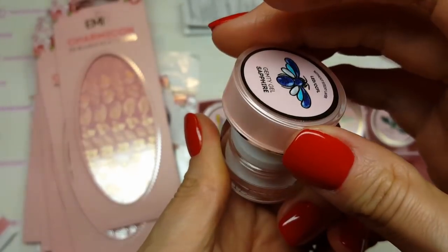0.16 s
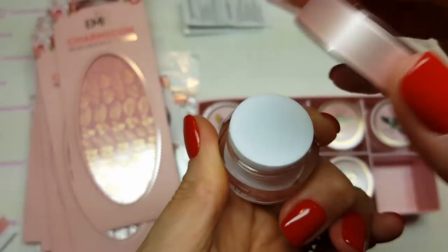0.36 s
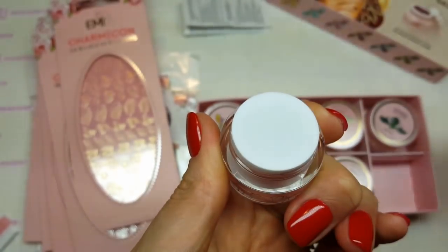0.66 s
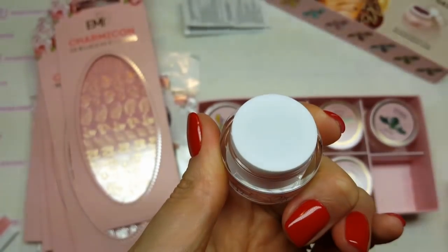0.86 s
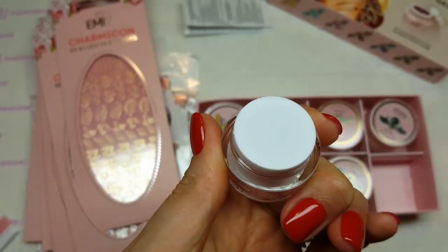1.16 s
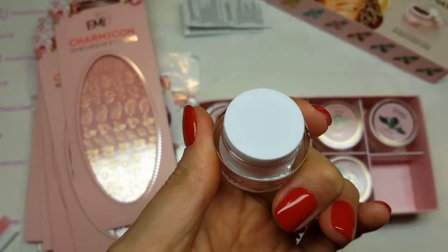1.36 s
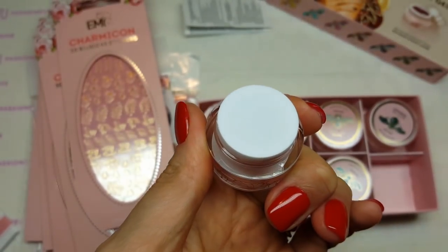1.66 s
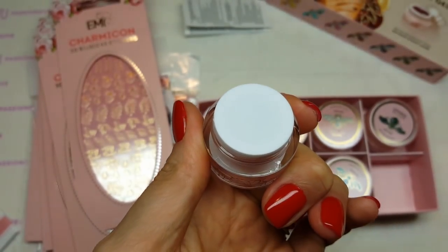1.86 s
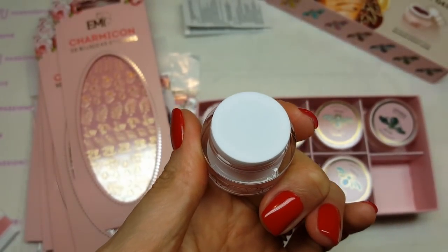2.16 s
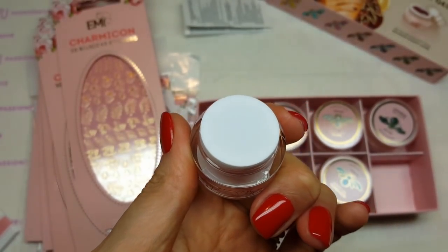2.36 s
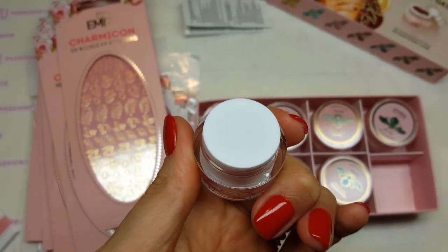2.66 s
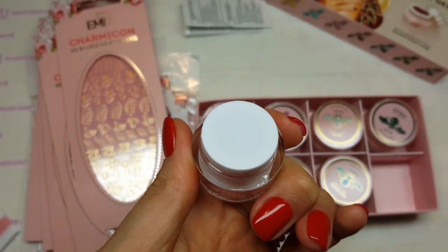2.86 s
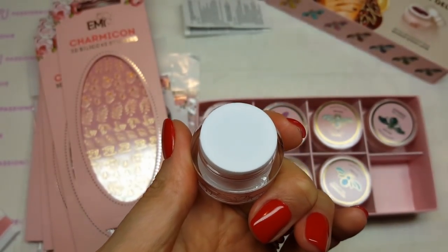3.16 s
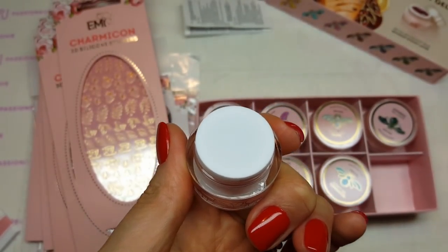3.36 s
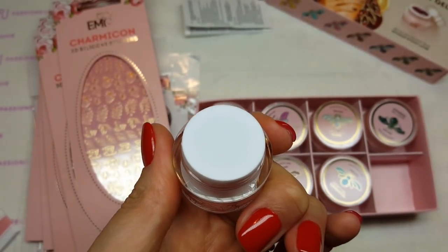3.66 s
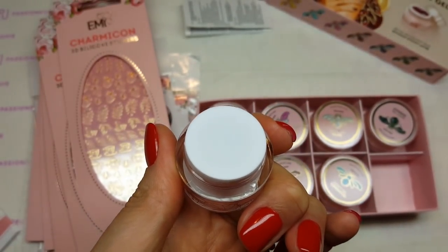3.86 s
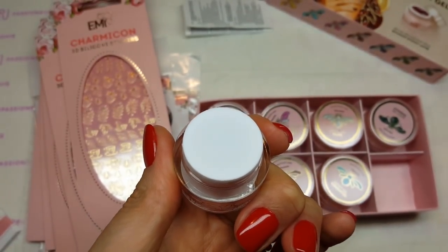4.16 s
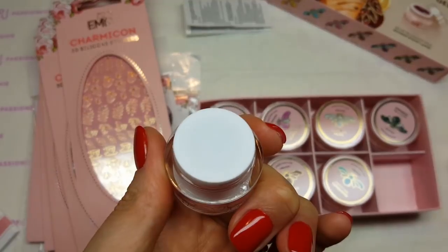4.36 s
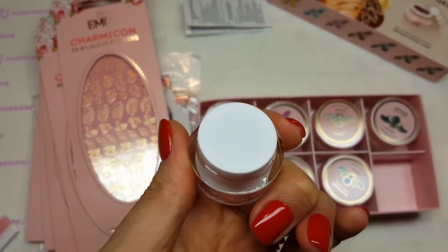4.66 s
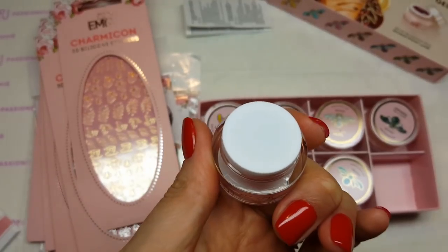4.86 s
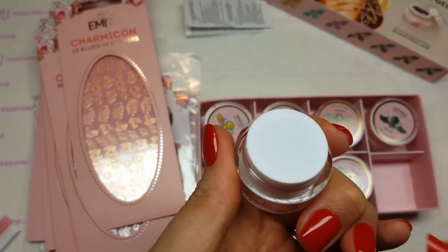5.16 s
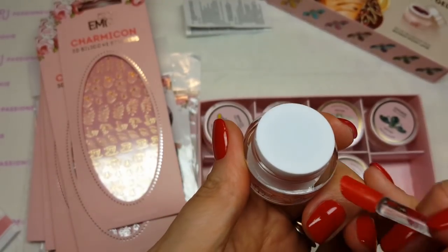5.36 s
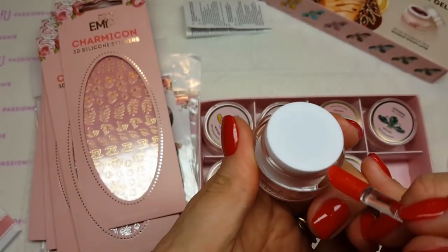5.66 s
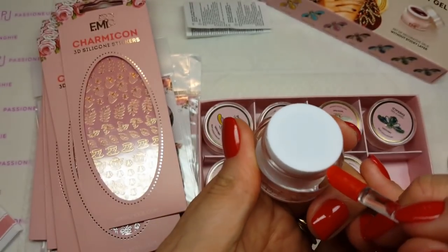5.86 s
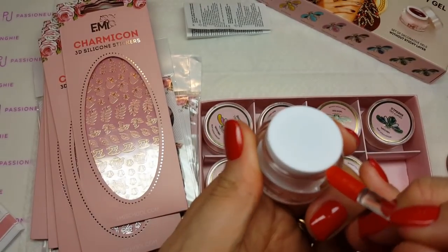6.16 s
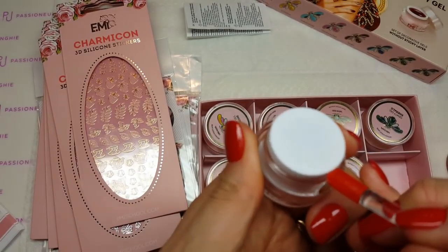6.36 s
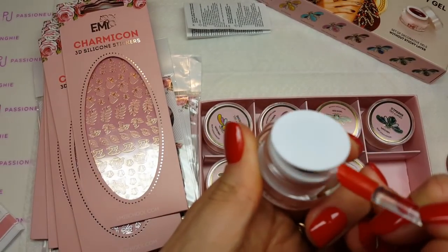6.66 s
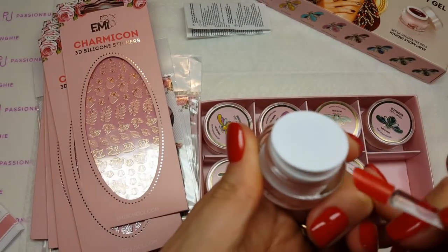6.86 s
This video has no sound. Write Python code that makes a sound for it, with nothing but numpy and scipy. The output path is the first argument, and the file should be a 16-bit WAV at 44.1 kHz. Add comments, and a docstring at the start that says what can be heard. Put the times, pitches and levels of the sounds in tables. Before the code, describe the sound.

Low room air, microphone hiss and a very faint electronic whine run throughout, in a small bare room that rings briefly after each sound. A light fingernail click comes at about 1 second. At 1.7 seconds a small plastic lid touches a table, gives a sharp tick near 1.9, and scrapes along with a light rattle. It lands at 2.4 seconds with a crisp clack, the loudest moment, followed by a tiny tick. From about 3.8 to 4.9 seconds, nearer the microphone, a hand shifts its grip on the hollow jar, making soft bumps, slight skin rubs and nail ticks, busiest around 4.5. After a pause, a nail taps the jar at 6.4 seconds, and fingertips rustle with a fine dry crackle until about 6.8 as they take up a brush. All the handling sounds come from slightly right of centre.

```python
"""A small bare room, with a table to the right of a camera's stereo microphone. The plastic lid of a
small jar, just taken off, touches the table, scrapes along it in tiny slips and clacks down, ringing
briefly. Nearer the microphone, a hand shifts its grip on the hollow jar with soft bumps and nail ticks,
then fingertips rustle as they take up a brush. The room rings after each sound, and under it all
lie room air, microphone hiss and the faint whine of the camera's electronics."""
import sys
import numpy as np
from scipy import signal
from scipy.fft import rfft, irfft, next_fast_len
from scipy.io import wavfile

SR = 44100
rng = np.random.default_rng(int(sys.argv[2]) if len(sys.argv) > 2 else 0)


def generate_wav(signal):
    """Clip the signal to [-1, 1] and save it as 16-bit WAV at the path in sys.argv[1]."""
    frames = np.transpose(np.atleast_2d(signal))
    scaled = np.clip(frames, -1, 1) * 32767
    pcm = np.round(scaled).astype(np.int16)
    wavfile.write(sys.argv[1], SR, pcm)


N = 309582

# room air and microphone hiss: (frequency [Hz], relative level [dB])
AIR_SPECTRUM = [(15, -21), (25, -11.5), (114, 1.5), (184, -3.5), (260, -2), (1100, -11.5), (1320, -10.5),
                (1430, -12), (2190, -13.5), (2640, -14), (5860, -18.5), (7070, -21), (8980, -20),
                (10500, -18), (14500, -20.5)]
# stereo image of that air: (frequency [Hz], left-right likeness [-1 to 1])
AIR_LIKENESS = [(60, 0.44), (150, 0.23), (600, 0)]
# steady tones of the electronics: (frequency [Hz], level [dB])
ELECTRONIC_TONES = [(49.5, -82.5), (1359.5, -85), (2719, -88.5), (10894, -103)]
# the room's decay: (frequency [Hz], time to fall 60 dB [s])
ROOM_DECAY = [(100, 0.32), (300, 0.58), (600, 0.38), (2000, 0.4), (5000, 0.37), (13000, 0.37)]
# colour of the room's tail: (frequency [Hz], gain [dB])
ROOM_SPECTRUM = [(100, 4), (300, -.5), (600, 0), (1000, -4), (2100, -5), (3200, -5), (5000, -1.5),
                 (13000, -6.5)]
# stereo image of the tail: (frequency [Hz], left-right likeness [-1 to 1])
ROOM_LIKENESS = [(100, 0.845), (300, 0.91), (630, 0.61), (1370, -.05), (3000, 0.0092)]

# skin rubs on the jar: (start [s], length [s], relative level [dB])
GRIP_STROKES = [(3.77, 0.031, -71), (4.315, 0.082, -66.5), (4.535, 0.024, -62.5)]
# colour of that rubbing: (frequency [Hz], relative level [dB])
GRIP_SPECTRUM = [(150, -48), (250, 3), (485, -11), (693, -8.5), (2500, -15.5), (3310, -21.5), (11000, -28),
                 (14500, -31)]
# fingertips take up the brush: (start [s], length [s], relative level [dB])
FINGER_STROKES = [(6.495, 0.155, -64), (6.665, 0.083, -58)]
# colour of their rustle: (frequency [Hz], relative level [dB])
FINGER_SPECTRUM = [(100, -32), (290, 9), (500, -17), (2000, 0), (4000, -5.5), (6500, 1.5), (8000, 7),
                   (11000, 2.5), (13500, 13), (16000, -15)]
# flesh bumps the jar and a nail ticks with it:
# (time [s], bump level [dB], bump tilt [dB/octave], nail level [dB], nail tilt [dB/octave])
GRIP_BUMPS = [(1.079, -57.5, -8, -70, 0), (1.732, -42.5, 6.5, -45, -2), (3.7558, -42.5, 5.5, -36, -2.5),
              (4.0316, -54, -1, -38.5, 3), (4.222, -41.5, 4, -47, 3), (4.335, -50, 5, -55, -2),
              (4.394, -45, 4, -40.5, -0.5), (4.501, -42, -2, -57, -4), (4.547, -38, 3.5, -43, -3),
              (4.5597, -35.5, 1.5, -33.5, 0.5)]
# modes of a bump's thud: (frequency [Hz], relative level [dB], time to fall 60 dB [s])
THUD_MODES = [(77, -8, 0.07), (110.2, 0.5, 0.16), (186, 0.5, 0.034), (235, -5, 0.044), (297.4, -6, 0.072),
              (440, -9.5, 0.014), (705, -18.5, 0.027)]
# modes of the hollow jar: (frequency [Hz], relative level [dB], time to fall 60 dB [s])
JAR_MODES = [(770, 8.5, 0.014), (1495, 7, 0.018), (3080, 0, .008)]
# a nail taps the jar: (time [s], level [dB], tilt [dB/octave])
JAR_TAPS = [(4.0318, -41, 1), (4.489, -48, 3), (6.3945, -45.5, 13)]
# nails click on their own, close to the microphone: (time [s], level [dB], tilt [dB/octave])
NAIL_CLICKS = [(1.048, -42.5, 5), (4.5705, -32, 7.5), (4.8684, -41, 1), (6.3945, -40, 5),
               (6.4975, -40, 4.5), (6.5255, -36, 0.5), (6.557, -40, 0.5), (6.6425, -38, -2),
               (6.672, -36.5, 9)]
# colour of nail clicks and catching skin: (frequency [Hz], relative level [dB])
CLICK_SPECTRUM = [(100, -34), (400, -4), (800, 1.5), (1500, 4.5), (2500, 16), (4500, 1), (6500, 3.5),
                  (9000, 0), (13000, -3), (16000, -15.5)]

# the lid is pushed lightly, then firmly, each layer at a relative level:
# (start [s], length [s], judder [dB], chatter [dB], hiss [dB])
LID_PUSHES = [(1.756, 0.11, -52.5, -47.5, -61.5), (1.965, 0.43, -45, -48, -68.5)]
# the lid juddering on the table: (frequency [Hz], relative level [dB])
JUDDER_SPECTRUM = [(40, -32), (80, -20.5), (115, -12), (170, -10), (250, -8), (330, -0.5), (420, -1.5),
                   (520, -4), (700, -4.5), (950, -4), (1300, -8.5), (2500, -40.5)]
# its rim chattering: (frequency [Hz], relative level [dB])
CHATTER_SPECTRUM = [(400, -32.5), (900, -1.5), (1300, 7), (1650, 5.5), (2000, 5), (2600, -2.5), (3200, -10),
                    (3900, -18), (6000, -47.5)]
# the fine surface texture hissing: (frequency [Hz], relative level [dB])
HISS_SPECTRUM = [(1500, -10.5), (3500, -2), (5000, -1.5), (8000, -10), (12000, -12), (15000, -7.5)]
# the lid's hard edge ticks: (time [s], level [dB], tilt [dB/octave])
EDGE_TICKS = [(1.7315, -32.5, -6), (1.9322, -19.5, 2), (1.9412, -36, 6), (2.604, -34, -10)]
# colour of those ticks: (frequency [Hz], relative level [dB])
EDGE_SPECTRUM = [(100, -48), (800, -24), (3000, -11.5), (5300, -7), (6800, -4.5), (9000, -0.5), (13000, 2),
                 (16000, -5)]
# the rim knocks on the table, then clacks down: (time [s], level [dB], tilt [dB/octave])
LID_KNOCKS = [(1.7312, -38, -2), (1.765, -40, 2.5), (1.893, -31.5, 0.5), (1.9845, -35.5, -2.5),
              (2.064, -31.5, -2), (2.146, -25.5, -1.5), (2.4017, -7.5, -1.5)]
# modes of the lid on the table: (frequency [Hz], relative level [dB], time to fall 60 dB [s])
LID_MODES = [(340, -17.5, 0.013), (536, -7.5, 0.05), (604, -6.5, 0.046), (703, -7, 0.045),
             (948, -5.5, 0.066), (1311, -7.5, 0.049), (1585, -1, 0.028), (1997, 8, 0.014),
             (2287, -4.5, 0.02), (3045, -4, 0.024), (3337, -10, 0.011)]
# the snap of the rim's contact: (frequency [Hz], relative level [dB])
SNAP_SPECTRUM = [(40, -45), (200, -21), (700, -1.5), (2300, 7.5), (3300, 9.5), (4300, 1), (5200, -2.5),
                 (6500, -3.5), (8000, -13.5), (10000, -8), (15000, -31.5)]


def amp(db):
    """Decibels as a gain."""
    return 10 ** (np.asarray(db) / 20)


def unit(x):
    """x scaled to rms 1."""
    return x / np.sqrt(np.mean(x ** 2) + 1e-20)


def along(points, hz):
    """A curve through (frequency, value) points on a log axis."""
    freqs, values = np.transpose(points)
    return np.interp(np.log(hz + 1), np.log(freqs + 1), values)


def filtered(x, response):
    """x times a complex response of frequency."""
    n = x.shape[-1]
    size = next_fast_len(n + SR // 2)
    return irfft(rfft(x, size) * response(np.fft.rfftfreq(size, 1 / SR)), size)[..., :n]


def impulse(spectrum, tilt_db=0, size=2048):
    """The shortest causal pulse with this spectrum, tilted per octave above 500 Hz."""
    hz = np.fft.rfftfreq(size, 1 / SR)
    octaves = np.log2(np.maximum(hz, 500) / 500)
    cepstrum = irfft(np.log(amp(along(spectrum, hz) + tilt_db * octaves)))
    cepstrum[1:size // 2] *= 2
    cepstrum[size // 2 + 1:] = 0
    return irfft(np.exp(rfft(cepstrum)))


def ring(modes, tilt_db):
    """Damped modes of alternating sign; a harder blow tilts them upward."""
    t = np.arange(SR // 4) / SR
    return sum((-1) ** k * amp(db + tilt_db * np.log2(hz) - 60 * t / t60) * np.sin(2 * np.pi * hz * t)
               for k, (hz, db, t60) in enumerate(modes))


def crack(spectrum, tilt_db, grit, decay_s):
    """A sharp contact and a few milliseconds of dense plastic ringing."""
    t = np.arange(SR // 20) / SR
    contact = grit * rng.standard_normal(len(t)) * np.exp(-t / decay_s)
    contact[0] = 1
    return np.convolve(contact, impulse(spectrum, tilt_db))


def strikes(rows, sound):
    """sound(tilt) placed at each row's time and peak level."""
    track = np.zeros(N + SR)
    for time_s, db, tilt_db in rows:
        hit = sound(tilt_db)
        track[round(time_s * SR):][:len(hit)] += amp(db) * hit / np.abs(hit).max()
    return track[:N]


def scattered(start_s, end_s, per_second, db, tilt_db, spread_db, sag_db_per_s=0, count=40):
    """Small uneven contacts, as rows of (time [s], level [dB], tilt [dB/octave])."""
    jitter, strength = rng.random((count, 2)).T
    t = (np.arange(count) + jitter) / per_second
    levels = db + spread_db * (2 * strength - 1) - sag_db_per_s * t
    return [(s, level, tilt_db) for s, level in zip(start_s + t, levels) if s < end_s]


def slips(spectrum, per_second, spread_db):
    """Friction of rms 1: tiny slips of uneven size, each ringing with the spectrum."""
    sizes = amp(spread_db * np.clip(rng.standard_normal(N), -2, 2)) * rng.choice([-1, 1], N)
    slipping = rng.random(N) < per_second / SR
    return unit(signal.fftconvolve(sizes * slipping, impulse(spectrum))[:N])


def stroke(start_s, length_s, attack_s, release_s):
    """One gain per sample: a straight rise, a hold, and a dying release."""
    t = np.arange(N) / SR - start_s
    return np.clip(t / attack_s, 0, 1) * np.exp(-np.maximum(t - length_s, 0) / release_s)


def paired(noises, likeness):
    """Two unrelated noises become left and right with the given likeness."""
    turn = lambda hz: np.arccos(np.clip(along(likeness, hz), -1, 1)) / 2
    mid, side = filtered(noises, lambda hz: np.array([np.cos(turn(hz)), np.sin(turn(hz))]))
    return np.array([mid + side, mid - side])


def from_right(x, lag_ms, shade_db):
    """The microphone's left port hears a source on the right later and weaker."""
    left = filtered(x, lambda hz: np.exp(-2j * np.pi * hz * lag_ms / 1000))
    return np.array([left * amp(-shade_db / 2), x * amp(shade_db / 2)])


def room_tone():
    """Room air and microphone hiss, partly alike on both sides in the bass."""
    noise = paired(rng.standard_normal((2, N)), AIR_LIKENESS)
    return amp(-67) * unit(filtered(noise, lambda hz: amp(along(AIR_SPECTRUM, hz))))


def buzz(centre_hz, width_hz, pulses, sharpness):
    """A narrow band of electronic hiss that swells once per counted pulse."""
    band = filtered(rng.standard_normal((2, N)), lambda hz: np.exp(-((hz - centre_hz) / width_hz) ** 2))
    return unit(band * np.exp(sharpness * np.cos(2 * np.pi * pulses)))


def electronics(pulse_hz=33.5, frame_hz=29.9, quicken_s=5.0):
    """The camera's tones, frame-rate buzz and a whine that pulses twice as fast from quicken_s on."""
    t = np.arange(N) / SR
    tones = sum(amp(db) * np.sqrt(2) * np.sin(2 * np.pi * hz * t) for hz, db in ELECTRONIC_TONES)
    pulses = pulse_hz * (t + np.maximum(t - quicken_s, 0))
    whine = amp(-79.5) * buzz(6960, 550, pulses, sharpness=2.5)
    whine += amp(-85.5) * buzz(10300, 700, pulses, sharpness=1.2)
    whine *= amp(2.5 * (t > quicken_s))
    frame_buzz = amp(-78) * buzz(10900, 110, frame_hz * t, sharpness=0.93)
    return tones + whine + frame_buzz


def room(x, build_s):
    """The bare room's diffuse tail builds up, each frequency dying at its own speed."""
    hz, t, noise = signal.stft(rng.standard_normal((2, SR * 2 // 3)), SR, nperseg=256)
    fade = amp(-60 * t / along(ROOM_DECAY, hz)[:, None]) * (1 - np.exp(-(t / build_s) ** 2))
    energy = np.sum(fade ** 2, axis=1, keepdims=True) * t[1] * SR
    fade *= amp(along(ROOM_SPECTRUM, hz))[:, None] / np.sqrt(energy)
    tail = paired(signal.istft(noise * fade, SR, nperseg=256)[1], ROOM_LIKENESS)
    return signal.fftconvolve(x[None], tail, axes=1)[:, :N]


def wall_echo(x, delay_ms, dull_hz):
    """A near wall sends back a late copy without its treble."""
    return filtered(x, lambda hz: np.exp(-2j * np.pi * hz * delay_ms / 1000) / (1 + (hz / dull_hz) ** 2))


def rubs(rows, attack_s, release_s):
    """The gain of several strokes, each at its own level."""
    return sum(amp(db) * stroke(s, length_s, attack_s, release_s) for s, length_s, db in rows)


def skin():
    """Skin slips on the jar; later the fingertips rustle on the brush."""
    grip = amp(9) * slips(GRIP_SPECTRUM, per_second=1500, spread_db=3)
    grip *= rubs(GRIP_STROKES, attack_s=0.018, release_s=0.026)
    rustle = amp(3.5) * slips(FINGER_SPECTRUM, per_second=1800, spread_db=4.5)
    rustle *= rubs(FINGER_STROKES, attack_s=0.021, release_s=0.015)
    return grip + rustle


def skin_crackle():
    """Dry skin catches in tiny ticks as the fingers take up the brush."""
    catches = scattered(start_s=6.475, end_s=6.805, per_second=83, db=-42, tilt_db=7, spread_db=6)
    return strikes(catches, lambda tilt: crack(CLICK_SPECTRUM, tilt, grit=0.16, decay_s=0.00097))


def hand_on_jar(jolt_db=-13.5, jolt_tilt_db=-1):
    """Flesh thuds and nails click; nail taps ring the hollow jar, and so does each bump, softly."""
    bumps = [(s, db, tilt) for s, db, tilt, _, _ in GRIP_BUMPS]
    clicks = [(s, db, tilt) for s, _, _, db, tilt in GRIP_BUMPS]
    jolts = [(s, db + jolt_db, jolt_tilt_db) for s, db, _ in bumps]
    thuds = strikes(bumps, lambda tilt: ring(THUD_MODES, tilt))
    jar = strikes(list(JAR_TAPS) + jolts, lambda tilt: ring(JAR_MODES, tilt))
    nails = strikes(list(NAIL_CLICKS) + clicks,
                    lambda tilt: crack(CLICK_SPECTRUM, tilt, grit=0.2, decay_s=0.0013))
    return thuds + jar + nails


def pushes(full_speed_s=0.17):
    """Gains of judder, chatter and hiss; as the lid slows, chatter fades first and judder last."""
    sag_db_per_s = np.array([[11.5], [51], [40]])
    gains = np.zeros((3, N))
    for start_s, length_s, *levels in LID_PUSHES:
        slowing_s = np.maximum(np.arange(N) / SR - start_s - full_speed_s, 0)
        push = stroke(start_s, length_s, attack_s=0.012, release_s=0.068)
        gains += amp(np.array(levels)[:, None] - sag_db_per_s * slowing_s) * push
    return gains


def lid_scrape():
    """The sliding lid judders on the table top, its rim chatters, and the fine texture hisses."""
    judder, chatter, hiss = pushes()
    judder *= amp(-0.5) * slips(JUDDER_SPECTRUM, per_second=1100, spread_db=-0.5)
    chatter *= amp(3) * slips(CHATTER_SPECTRUM, per_second=400, spread_db=4)
    hiss *= amp(3) * slips(HISS_SPECTRUM, per_second=1500, spread_db=3.5)
    return judder + chatter + hiss


def lid_ticks():
    """The lid's hard edge makes short, sharp contacts."""
    return strikes(EDGE_TICKS, lambda tilt: crack(EDGE_SPECTRUM, tilt, grit=0.22, decay_s=0.002))


def clack(tilt_db):
    """One knock: the lid's modes ring under a short snap."""
    body = ring(LID_MODES, tilt_db)
    snap = crack(SNAP_SPECTRUM, tilt_db, grit=0.14, decay_s=0.0016)
    body[:len(snap)] += amp(-4.5) * np.abs(body).max() * snap / np.abs(snap).max()
    return body


def lid_clacks(bass_hz=120):
    """The rim knocks, rattles during the firm push and lands; so small a body radiates little bass."""
    rattle = scattered(start_s=2.01, end_s=2.39, per_second=25, db=-33, tilt_db=3.5,
                       spread_db=4, sag_db_per_s=27)
    knocks = strikes(list(LID_KNOCKS) + rattle, clack)
    direct = filtered(knocks, lambda hz: (1j * hz / (bass_hz + 1j * hz)) ** 2)
    return direct + amp(-2.5) * wall_echo(direct, delay_ms=11, dull_hz=1000)


def scene():
    """Lid and hands are right of the microphone; the hands are nearer and drier."""
    lid = lid_scrape() + lid_clacks()
    ticks = lid_ticks()
    hands = skin_crackle() + hand_on_jar() + skin()
    direct = from_right(lid + ticks, lag_ms=0.28, shade_db=3)
    direct += from_right(hands, lag_ms=0.2, shade_db=2.6)
    lid_room = room(lid, build_s=0.006) + room(ticks, build_s=0.005)
    hand_room = amp(-4.5) * room(hands, build_s=0.008)
    reflections = (lid_room + hand_room) * amp([[-0.8], [0.8]])  # the nearest surfaces lie right too
    return direct + reflections + room_tone() + electronics()


def record(dry):
    """The camera keeps nothing above its band limit."""
    limit_hz = 14750
    return filtered(dry, lambda hz: 1 / (1 + (hz / limit_hz) ** 120))


dry = scene()
out = record(dry)
generate_wav(out)
```